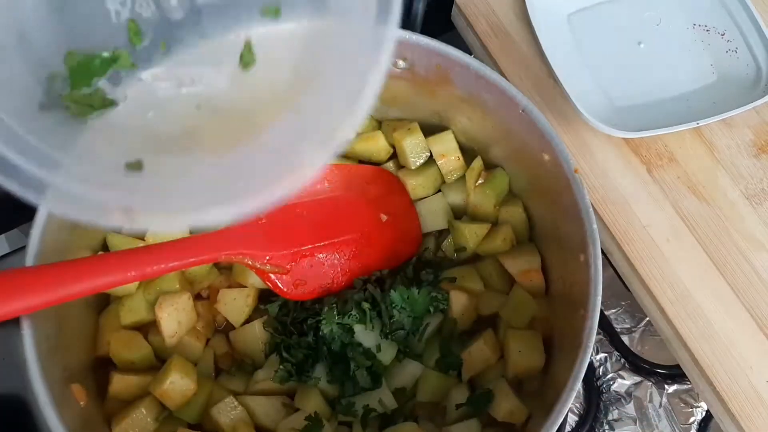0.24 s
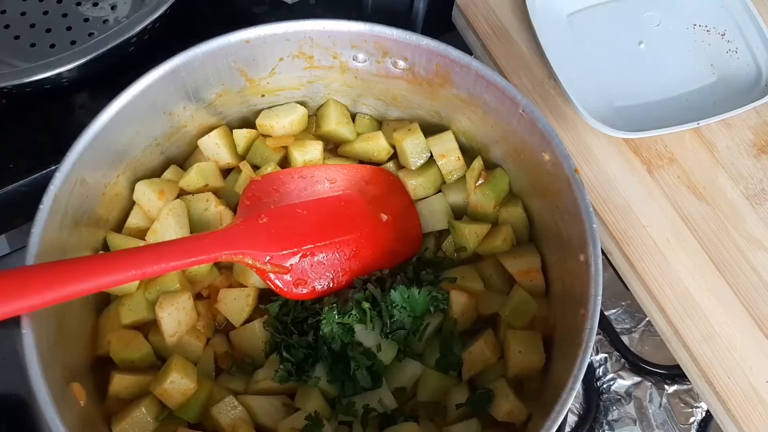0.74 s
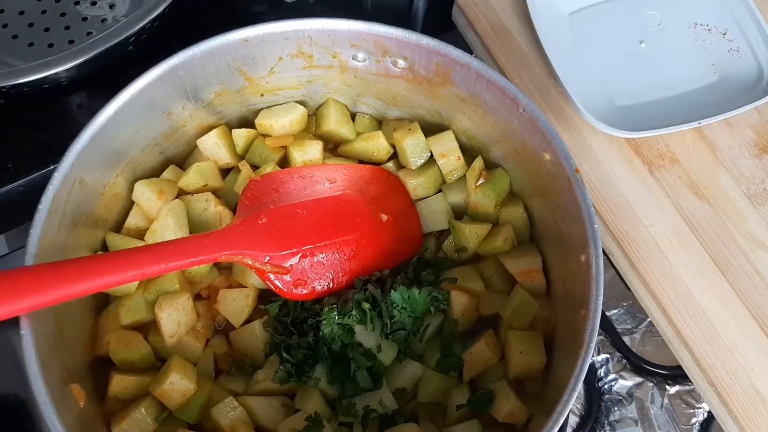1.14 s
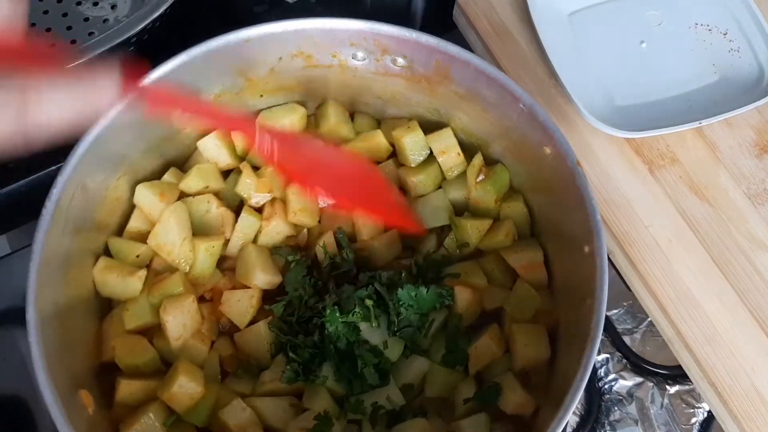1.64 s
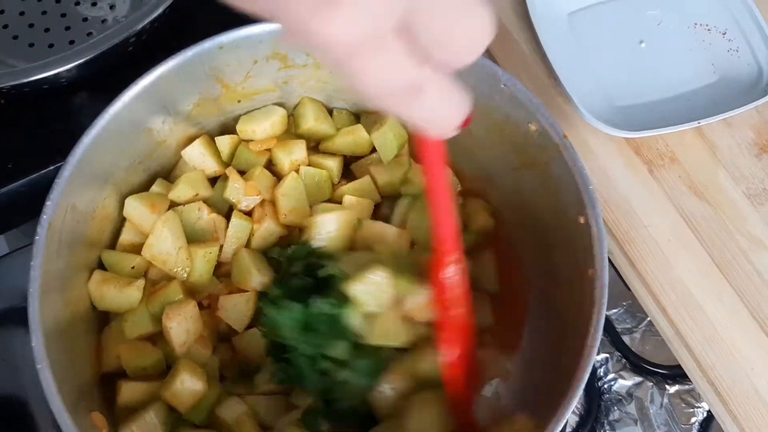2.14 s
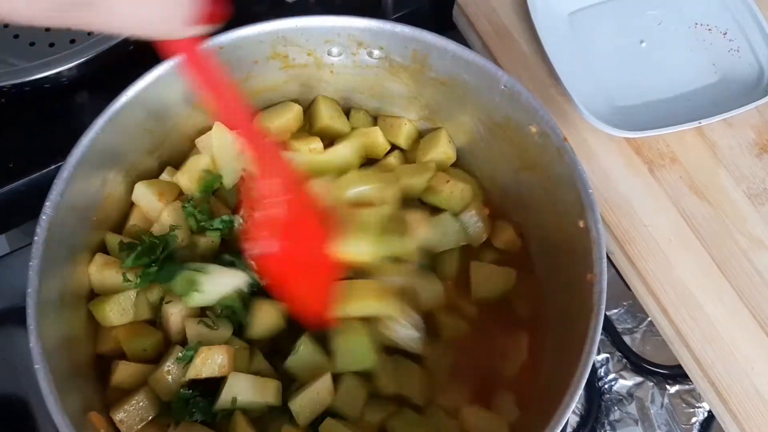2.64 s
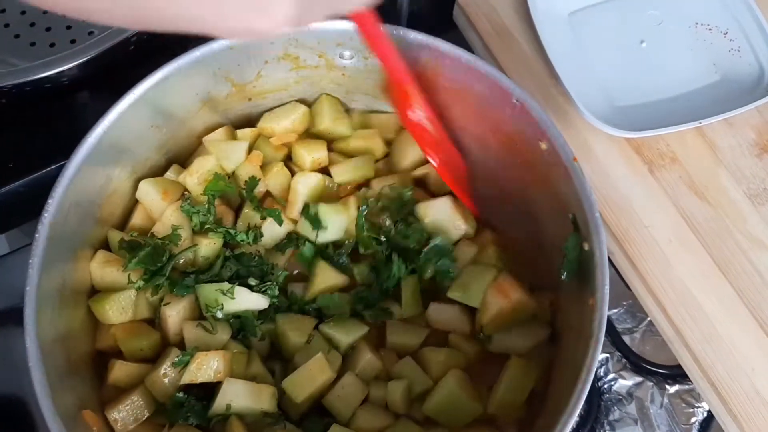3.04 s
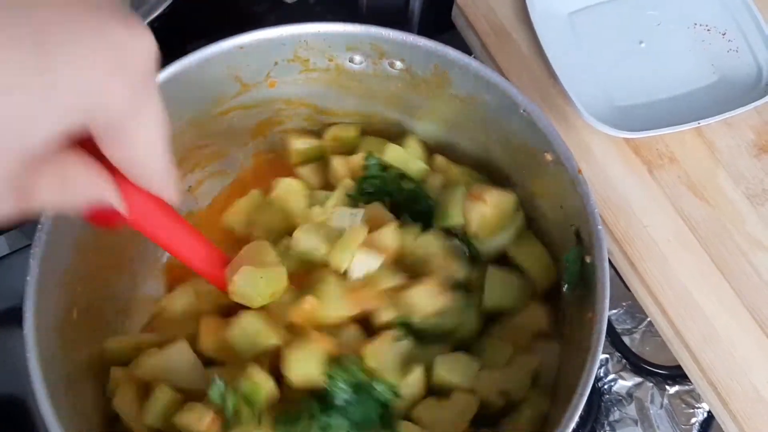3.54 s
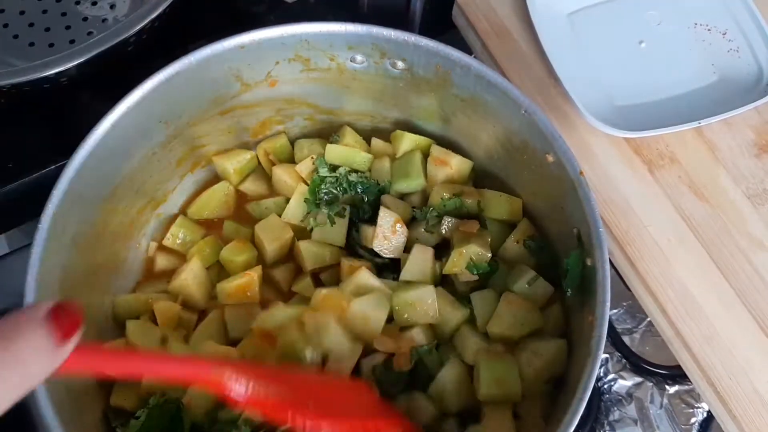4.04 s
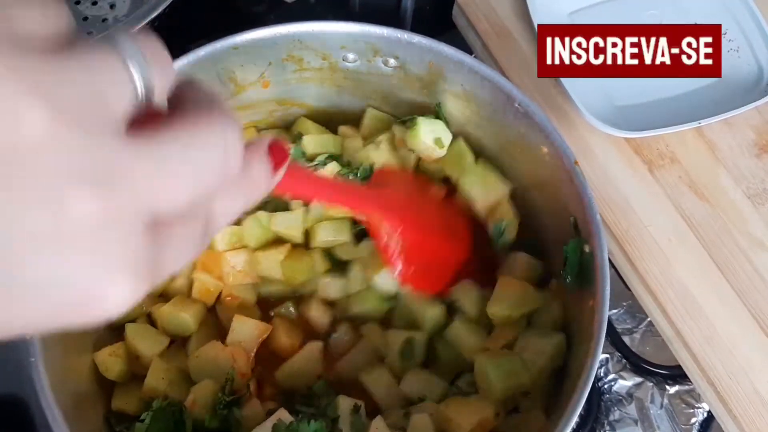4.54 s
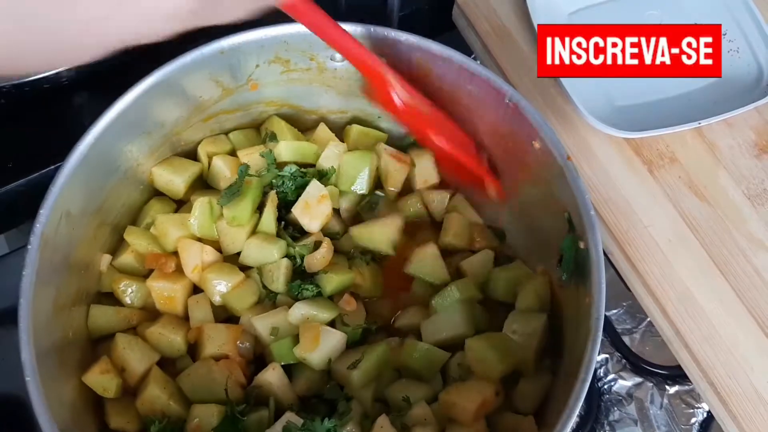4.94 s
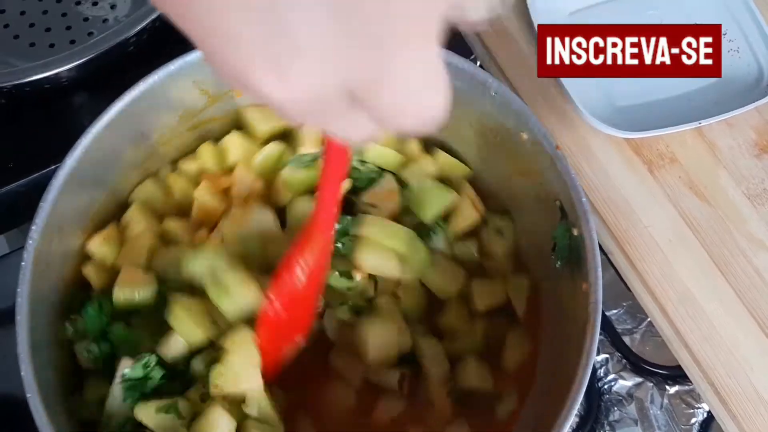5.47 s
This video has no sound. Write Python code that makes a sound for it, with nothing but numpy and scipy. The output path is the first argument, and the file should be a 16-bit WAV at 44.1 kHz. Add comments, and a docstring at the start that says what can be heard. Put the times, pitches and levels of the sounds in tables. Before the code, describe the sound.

A gas burner murmurs and hisses faintly throughout, under a quiet wet crackle from a metal pot, heard up close in a small kitchen. At about 0.6 seconds the diced vegetables shift with a brief moist rustle. Just after 1 second, something hard is set down with one ringing, slightly rattling knock, the most prominent sound. From about 1.6 seconds a silicone spatula stirs in uneven strokes: the pieces crackle, squelch and tumble, a little water sloshes, and sharp little wet ticks are scattered on top. The blade swishes along the wall around 1.8 to 2.1 and 2.7 to 3.2 seconds, and gives two short, high squeaks at 2.3 and 2.5, the second softer. Pieces drop back with soft, dull thuds near 2.75 seconds, faintly at 3, and again between 4.5 and 5.1. The gentle stirring continues until the end, at about 5.7 seconds.

```python
"""A silicone spatula stirs diced vegetables and a little water in a metal pot, in a small kitchen.
The wet pieces crackle, tick and squelch as films snap and bubbles burst, then tumble back with soft thuds.
The blade swishes along the wall and squeaks where it catches. A gas burner murmurs throughout;
before the stirring, something hard is set down with one ringing knock."""
import sys
import numpy as np
from scipy import signal
from scipy.fft import rfft, irfft, next_fast_len
from scipy.io import wavfile

SR = 44100
rng = np.random.default_rng(int(sys.argv[2]) if len(sys.argv) > 2 else 0)


def to_wav(sig):
    """Store sig (one row per channel, or 1-D mono) as 16-bit WAV at the path in sys.argv[1].

    Samples outside -1..1 are clipped; the rate is SR.
    """
    pcm = np.clip(np.atleast_2d(sig), -1, 1) * 32767
    pcm = np.round(pcm).astype(np.int16)
    wavfile.write(sys.argv[1], SR, pcm.T)  # frames by channels


N = 251704
TIME = np.arange(N) / SR
POCKET_CYCLES = 56   # an air pocket rings down 60 dB in this many cycles

# Air resonances around the pot, whistles of the gas jet. Each row: centre in Hz, width in Hz, lift in dB.
AIR_PEAKS = [(292, 38, 4), (355, 14.4, 4.5), (470.7, 38, 9.5), (521.4, 38, 7), (654.5, 36, 9.5),
             (732, 30, 8.5), (5030, 500, 6), (7000, 1130, 11), (12400, 99, -1), (12800, 77, 15.5)]
# Stereo image. Each row: frequency in Hz, left-right correlation.
CORRELATION = [(60, 0.96), (290, 0.97), (640, 0.69), (1000, 0.064), (1500, 0), (15000, 0)]
# Dull bump of soft pieces. Each row: frequency in Hz, relative density in dB.
TUMBLE_SPECTRUM = [(50, -44), (95, -6), (130, -11), (210, 3.5), (320, -8), (500, -9.5), (700, -18),
                   (1200, -30), (3000, -46)]


def from_db(db):
    """Decibels to gain."""
    return 10 ** (np.asarray(db) / 20)


def rms_one(x):
    """Scale to rms 1."""
    return x / np.sqrt(np.mean(x ** 2) + 1e-20)


def at_hz(points, hz):
    """Read a table on a log-frequency axis."""
    knots_hz, values = np.transpose(points)
    return np.interp(np.log(hz + 1), np.log(knots_hz), values)


def colour(x, spectrum, peaks=()):
    """Filter by a smooth spectrum with resonances on top."""
    size = next_fast_len(x.shape[-1])
    hz = np.fft.rfftfreq(size, 1 / SR)
    peaks_db = sum(db / (1 + (2 * (hz - centre_hz) / width_hz) ** 2) for centre_hz, width_hz, db in peaks)
    return irfft(rfft(x, size) * from_db(at_hz(spectrum, hz) + peaks_db), size)[..., :x.shape[-1]]


def spread(pair):
    """Two unrelated signals to stereo: alike in the bass, apart in the treble."""
    size = next_fast_len(pair.shape[-1])
    alike = at_hz(CORRELATION, np.fft.rfftfreq(size, 1 / SR))
    mid, side = rfft(pair, size) * np.sqrt([1 + alike, 1 - alike])
    return irfft(np.array([mid + side, mid - side]) / np.sqrt(2), size)[:, :pair.shape[-1]]


def high_pass(x, hz):
    """Fourth-order bass cut."""
    return signal.sosfilt(signal.butter(4, hz, "high", fs=SR, output="sos"), x)


def drift(rate_hz):
    """Random curve through unit Gaussian knots."""
    knots_s = np.arange(0, TIME[-1] + 1, 1 / rate_hz)
    return np.interp(TIME, knots_s, rng.standard_normal(8192)[:len(knots_s)])


def decay(t, t60_s):
    """Envelope that loses 60 dB in t60_s."""
    return np.exp(-np.log(1000) * t / t60_s)


def swell(full_s, hold_s, attack_s, release_s):
    """Envelope that reaches 1 at full_s, holds and falls."""
    corners_s = [full_s - attack_s, full_s, full_s + hold_s, full_s + hold_s + release_s]
    return np.interp(TIME, corners_s, [0, 1, 1, 0]) ** 2


def gestures(rows, attack_s, release_s):
    """Summed gain of movements with a common attack and release."""
    return sum(from_db(db) * swell(full_s, hold_s, attack_s, release_s) for full_s, hold_s, db in rows)


def add(out, start_s, sound):
    """Mix a sound in at start_s."""
    at = round(start_s * SR)
    out[..., at:at + sound.shape[-1]] += sound[..., :N - at]


def burner(flame_db=-50.5, waver_db=-0.37, hum_hz=60.3, hum_db=-71):
    """The flame murmurs under the pot, the jet hisses, the mains hum faintly."""
    # Murmur and hiss. Each row: frequency in Hz, relative density in dB.
    spectrum = [(18, -63), (30, -63), (43, -19), (152, -4.5), (183, -9), (271, -1), (318, -13.5), (353, 1),
                (382, -4.5), (523, -9.5), (2210, -27.5), (3030, -23.5), (10700, -39.5), (12800, -27.5),
                (15800, -47)]
    flame = rms_one(colour(spread(rng.standard_normal((2, N))), spectrum, AIR_PEAKS))
    hum = np.sqrt(2) * np.sin(2 * np.pi * hum_hz * TIME)
    return flame * from_db(flame_db + waver_db * drift(11)) + from_db(hum_db) * hum


def stirring(start_s=1.7, rest_db=-11, settling_db=-6.5, wet_db=-6, release_s=0.11):
    """Gains of crackle, squelch, slosh and tumble: strokes over a floor that rises at start_s."""
    # Nudges and pushes. Each row: time of full effort in seconds, hold in seconds, effort in dB,
    # then squelch, slosh and tumble in dB relative to the effort.
    strokes = [(0.625, 0.059, -2.5, -1, -6, -11), (1.574, 0.083, -4.5, -18, -10, 0.5),
               (1.875, 0.009, 0.5, 0, 8, 1), (2.042, 0.13, -2, 3, -8, -10),
               (2.293, 0.045, -1.5, -8, -12, -1.5), (2.604, 0.11, -3.5, 0, -3, -4),
               (2.756, 0.019, -1, 0, -5, 7.5), (2.96, 0.66, -3, -3.5, -2, 0),
               (3.41, 0.12, -2.5, -6, -1, -1), (3.599, 0.14, -0.5, 0, 7.5, 1),
               (3.78, 0.088, -0.5, -4.5, -1, -7), (4.12, 0.017, -1, 0.5, 1.5, -2),
               (4.487, 0.22, -5, 1, -3, 4.5), (4.579, .003, -1, 7, 4, 3), (4.948, 0.21, -4, -10, -10, 6.5),
               (5.205, 0.18, -2, -1.5, -3, 0), (5.402, .004, 1, 8, 1.5, 3), (5.465, 0.041, -1.5, 6, 4, 6.5),
               (5.585, 0.094, -1.5, -3, -1, 6)]
    settling = from_db(settling_db) * swell(start_s, TIME[-1], attack_s=0.087, release_s=release_s)
    gains = np.outer(from_db([0, wet_db, wet_db, 0]), np.maximum(from_db(rest_db), settling))
    for full_s, hold_s, db, *shares_db in strokes:
        push = from_db(db) * swell(full_s, hold_s, attack_s=0.028, release_s=release_s)
        gains = np.maximum(gains, np.outer(from_db([0, *shares_db]), push))
    return gains


def bubbles(per_s, low_hz, high_hz, cycles, size_db, pitches=20):
    """Tiny bubbles burst at random, each ringing down at one of a set of pitches."""
    sizes = from_db(size_db * np.minimum(rng.exponential(1, N), 4)) * rng.choice([-1, 1], N)
    bursts = sizes * (rng.random(N) < per_s / SR)
    pitch_index = rng.integers(0, pitches, N)
    out = 0
    for k, hz in enumerate(np.geomspace(low_hz, high_hz, pitches)):
        radius = decay(1 / SR, cycles / hz)
        feedback = [1, -2 * radius * np.cos(2 * np.pi * hz / SR), radius ** 2]
        out = out + hz * signal.lfilter([1, 0, -1], feedback, bursts * (pitch_index == k) + 1e-18)
    return out


def vegetables(crackle_db=-58, pop_db=-68, squelch_db=-62, slosh_db=-63, tumble_db=-52.5, clump_db=3):
    """Moving pieces crackle, pop and squelch, push the water about and rumble against each other."""
    # Spectra of the wet layers. Each row: frequency in Hz, relative density in dB.
    crackle_spectrum = [(1200, -26), (2500, -9.5), (4500, 2.5), (7200, -1.5), (8300, -13), (11000, -4.5),
                        (15500, -5.5)]
    squelch_spectrum = [(900, -18), (1500, 3), (2300, 0.5), (3000, -2), (4200, -33), (7000, -30)]
    slosh_spectrum = [(450, -5), (700, -2), (820, 13.5), (1000, -1), (1350, -4.5), (1800, -26), (4000, -51)]
    effort, squelch_gain, slosh_gain, tumble_gain = stirring()
    clumps = from_db(clump_db * drift(45))
    fine = np.array([bubbles(2400, low_hz=2070, high_hz=15000, cycles=15, size_db=-1) for _ in range(2)])
    coarse = np.array([bubbles(600, low_hz=626, high_hz=3510, cycles=57, size_db=1) for _ in range(2)])
    sparse = bubbles(25, low_hz=3000, high_hz=7300, cycles=POCKET_CYCLES, size_db=4)
    bumps = rng.standard_normal((2, N)) * from_db(2 * drift(50))
    crackle = effort * from_db(crackle_db) * rms_one(clumps * colour(fine, crackle_spectrum))
    pops = effort * from_db(pop_db) * rms_one(sparse)
    squelch = squelch_gain * from_db(squelch_db) * rms_one(clumps * colour(coarse, squelch_spectrum))
    slosh = slosh_gain * from_db(slosh_db) * rms_one(colour(spread(coarse), slosh_spectrum))
    tumble = tumble_gain * from_db(tumble_db) * rms_one(colour(spread(bumps), TUMBLE_SPECTRUM, AIR_PEAKS))
    return crackle + pops + squelch + slosh + tumble


def ticks(snap_db=-5, echo_db=-10, pocket_width_hz=1500, pocket_lift_db=7):
    """A wet film snaps, the air pocket behind it rings, the pot's walls scatter the snap."""
    # Distinct ticks. Each row: start in seconds, ring level in dB, pitch in Hz,
    # gain of snap and echo over the ring in dB, their top-octave lift in dB.
    events = [(0.4911, -44, 5030, 4, 5), (1.881, -33, 3000, 7, -2.5), (1.9795, -32, 3600, 1.5, -11),
              (2.0288, -39, 7000, 0.5, 8), (2.082, -41.5, 3440, -0.5, 10), (2.152, -45, 2300, 3.5, 3),
              (2.7532, -44, 3180, 5.5, -10), (3.3082, -34, 6280, -4, 7), (3.5407, -45, 4750, 5.5, -2.5),
              (3.6055, -40, 7360, 3, -6), (3.6536, -39, 7100, -3, 2), (3.741, -36.5, 7200, 1, 2),
              (3.8003, -48, 4850, 6, 11), (3.859, -42.5, 4720, -2, -4), (4.532, -27.5, 6160, -11, -17),
              (4.5764, -35, 6200, 3.5, -17), (4.6968, -48, 5470, 7.5, -6), (4.9086, -40.5, 7000, 1.5, -13),
              (4.9553, -33.5, 6650, -7, 6), (4.995, -46, 5160, -1.5, 23.5), (5.1457, -35, 6640, 8.5, 3.5),
              (5.313, -45.5, 2180, 4, -4), (5.4002, -43, 2380, -5, 4), (5.4602, -38, 10560, -5, 8),
              (5.4848, -35.5, 7170, -3.5, -3), (5.5958, -37, 6070, -11, 6), (5.6391, -46.5, 4760, 6, -4)]
    # Film snap. Each row: frequency in Hz, relative density in dB.
    spectrum = [(400, -34), (1000, -6), (2000, 1), (4000, 9.5), (7200, 8.5), (8500, -3.5), (11000, 1),
                (15000, -41)]
    out, t = np.zeros((2, N)), TIME[:4096]
    for start_s, db, hz, broad_db, top_db in events:
        noise = colour(rng.standard_normal((3, len(t))), spectrum, [(hz, pocket_width_hz, pocket_lift_db)])
        noise = colour(rms_one(noise), [(7000, 0), (9500, top_db)])
        snap = from_db(snap_db) * noise[0] * decay(t, t60_s=0.005)
        echo = from_db(echo_db) * noise[1:] * decay(t, t60_s=0.047)
        ring = np.sin(2 * np.pi * hz * t + rng.uniform(-1.3, 1, (2, 1))) * decay(t, POCKET_CYCLES / hz)
        add(out, start_s, from_db(db) * (ring + from_db(broad_db) * (snap + echo)))
    return out


def knock(ring_db=-35, crack_db=-26, tail_db=-32):
    """A hard object lands on one edge, then the other, and rattles; contacts crack, the body rings."""
    # Contacts. Each row: start in seconds, relative level in dB.
    contacts = [(1.0416, 6), (1.043, 7), (1.0481, -0.5), (1.0657, -2), (1.0709, -5.5)]
    # Dense clatter. Each row: frequency in Hz, relative density in dB.
    spectrum = [(120, -41), (250, -6), (400, -9), (800, -6), (1500, -2.5), (1800, -23.5), (2300, -14.5),
                (3100, -23), (3650, -11.5), (4100, -20), (4550, -6.5), (5200, -22.5), (7200, -25),
                (8500, -42), (15000, -35)]
    # Body modes. Each row: frequency in Hz, relative level in dB, T60 in seconds.
    modes = [(195, -6.5, 0.66), (344, 10, 0.1), (360, -21, 0.2), (422, -13, 0.2), (420.5, 5, 0.21),
             (532, 3.5, 0.17), (635, -22, 0.32), (730, 0, 0.27), (876, -12, 0.22), (995, -4, 0.33),
             (1020, -15, 0.29), (1254, 0.5, 0.34), (1340, 0, 0.22), (1490, -9, 0.2), (1448, 15, 0.069),
             (1516, 7, 0.13), (2120, -6.5, 0.28), (2210, -17, 0.11), (3640, -15.5, 0.52), (3700, -3, 0.078),
             (4750, -17, .18), (4560, -10, 0.12), (4494, 8.5, 0.086), (6740, -20, 0.18)]
    out, t = np.zeros((2, N)), TIME[:SR // 2]
    envelope = from_db(crack_db) * decay(t, t60_s=0.028) + from_db(tail_db) * decay(t, t60_s=0.27)
    for start_s, db in contacts:
        crack = rms_one(colour(spread(rng.standard_normal((2, len(t)))), spectrum))
        add(out, start_s, from_db(db) * crack * envelope / np.sqrt(2))
    for k, (hz, db, t60_s) in enumerate(modes):
        # Modes alternate in sign; high ones reach left and right out of step.
        skew_rad = np.arccos(at_hz(CORRELATION, hz)) * np.array([[0.5], [-0.5]]) * rng.choice([-1, 1])
        ring = (-1) ** k * np.sin(2 * np.pi * hz * t + skew_rad)
        add(out, contacts[0][0], from_db(ring_db + db) * decay(t, t60_s) * ring)
    return high_pass(out, hz=150)


def wipes(grain_db=2, wander_db=5, ring_db=3):
    """The wet blade hisses along the wall; as it travels, the wall's resonances swell and fade."""
    # Blade passes. Each row: time of full pressure in seconds, hold in seconds, level in dB.
    passes = [(1.845, 0.021, -47), (1.97, .005, -52), (2.055, .005, -55.5), (2.74, .01, -56),
              (2.89, 0.056, -47.5), (3.005, 0.0056, -51), (3.115, 0.1, -48)]
    # Sliding hiss. Each row: frequency in Hz, relative density in dB.
    spectrum = [(2000, -15), (3100, -15), (3600, -5.5), (4300, -5.5), (5000, 1), (6500, -12), (7400, -5.5),
                (8500, -11), (12000, -10), (15500, -14)]
    # Wall resonances. Each row: centre in Hz, width in Hz, relative level in dB.
    wall_peaks = [(3650, 130, 12.5), (4120, 88, 11.5), (4350, 43, 7), (4610, 43, 10), (4960, 120, -7),
                  (5960, 230, 11), (6590, 88, 15), (6800, 210, 3)]
    friction = rng.standard_normal((2, N)) * from_db(grain_db * drift(210))
    hiss = rms_one(colour(friction, spectrum))
    ring = 0
    for hz, width_hz, db in wall_peaks:
        b, a = signal.iirpeak(hz, hz / width_hz, fs=SR)
        ring = ring + from_db(db + wander_db * drift(34.15)) * signal.lfilter(b, a, hiss)
    pressure = gestures(passes, attack_s=0.067, release_s=0.046)
    return pressure * rms_one(hiss + from_db(ring_db) * rms_one(ring))


def squeaks(pitch_waver=0.0047, flutter_db=2, rasp_db=-13, held_db=-12):
    """Friction drives inharmonic tones over a rasp; the metal rings on softly after the blade slips."""
    # Blade catches. Each row: time of full grip in seconds, hold in seconds, level in dB.
    catches = [(2.274, 0.0064, -34.5), (2.527, 0.0033, -42.5)]
    # Tones of the metal. Each row: frequency in Hz, relative level in dB, T60 in seconds.
    tones = [(3090, -6.5, 0.27), (3950, -13, .4), (4850, 0.5, 0.16), (5270, -15.5, .3), (6300, -18, 0.29),
             (7000, -23, 0.41), (7270, -19, 0.38), (9090, -17, 0.38), (12570, -9.5, 0.36)]
    # Friction rasp. Each row: frequency in Hz, relative density in dB.
    spectrum = [(1900, -29), (2500, 0), (3200, -6), (4900, -5), (7200, -4), (8500, -9), (15000, -11)]
    grip = gestures(catches, attack_s=0.026, release_s=0.0076) + 1e-9
    grip_db = 20 * np.log10(grip)

    def ringing(t60_s):
        """Envelope that follows the grip, then decays freely from held_db below its peak."""
        fall_db = 60 * TIME / t60_s
        free_db = np.maximum.accumulate(grip_db + fall_db) - fall_db
        return np.maximum(grip, from_db(free_db + held_db))

    rasp = rms_one(colour(rng.standard_normal((2, N)), spectrum))
    out = ringing(t60_s=0.19) * from_db(rasp_db) * rasp
    for hz, db, t60_s in tones:
        phase = 2 * np.pi * np.cumsum(hz * (1 + pitch_waver * drift(400))) / SR
        stereo_tone = np.sin([phase, phase + 2 * drift(70)])
        out += ringing(t60_s) * from_db(db + flutter_db * drift(250)) * stereo_tone
    return out


def thuds(rise_s=0.0018, t60_s=0.041, gain_db=2, slap_db=-2):
    """Soft pieces land on the bottom with a dull slap and a short ring."""
    # Landings. Each row: start in seconds, level before gain_db in dB, pitch in Hz.
    landings = [(2.746, -33.5, 198), (2.774, -31.5, 235), (2.973, -45, 231), (3.007, -42, 213),
                (4.486, -40.5, 244), (4.954, -41, 260), (5.012, -37, 235), (5.08, -37, 196)]
    out, t = np.zeros(N), TIME[:SR // 2]
    envelope = decay(t, t60_s) * (1 - np.exp(-t / rise_s))
    for start_s, db, hz in landings:
        slap = from_db(slap_db) * rms_one(colour(rng.standard_normal(len(t)), TUMBLE_SPECTRUM))
        ring = np.sin(2 * np.pi * hz * t)
        add(out, start_s, from_db(db + gain_db) * (ring + slap) * envelope)
    return high_pass(out, hz=134)


def kitchen(x, t60_s=0.33, build_s=0.00077):
    """Hard walls return diffuse, slightly dull echoes; the response has unit energy."""
    t = TIME[:SR // 2]
    noise = colour(spread(rng.standard_normal((2, len(t)))), [(200, -1.5), (5000, -4.5), (14000, -5)])
    envelope = decay(t, t60_s) * (1 - np.exp(-t / build_s))
    response = rms_one(noise * envelope) / np.sqrt(len(t))
    return signal.fftconvolve(x, response, axes=1)[:, :N]


def scene():
    """Stereo mix; knock, ticks, thuds and blade also feed the room."""
    hit, tick, thud, squeak, wipe = knock(), ticks(), thuds(), squeaks(), wipes()
    contact_send = from_db(-14) * hit + from_db(-7) * tick + from_db(-12) * thud
    blade_send = from_db(1.5) * squeak + from_db(-8) * wipe
    room = kitchen(contact_send + blade_send)
    lean_left = from_db([[0.8], [-0.8]])
    return vegetables() + burner() + lean_left * tick + hit + wipe + squeak + thud + room


def record(dry):
    """Steep low-pass on the top treble."""
    cutoff_hz = 15850
    return signal.sosfilt(signal.ellip(12, 0.1, 70, cutoff_hz, fs=SR, output="sos"), dry)


dry = scene()
out = record(dry)
to_wav(out)
```